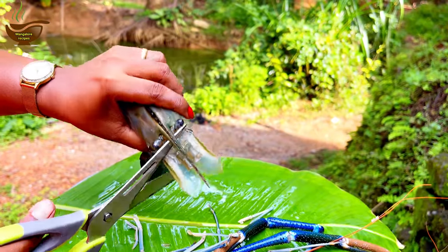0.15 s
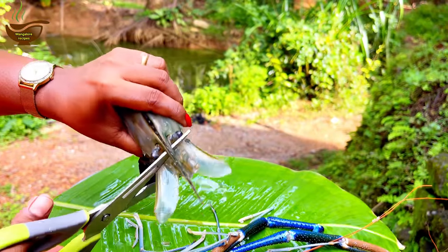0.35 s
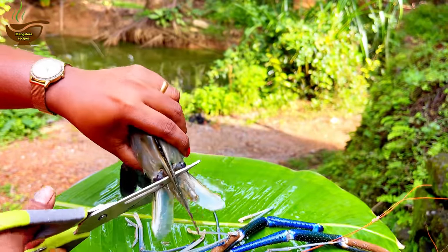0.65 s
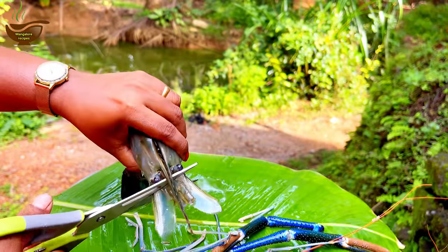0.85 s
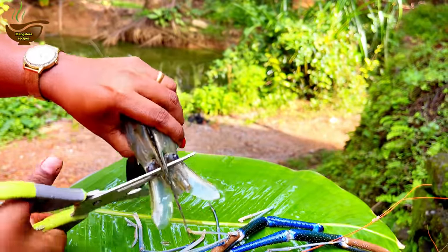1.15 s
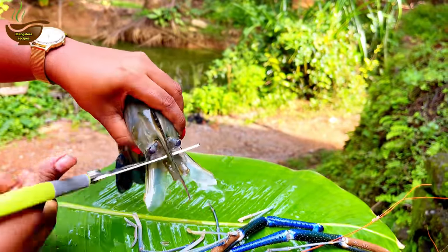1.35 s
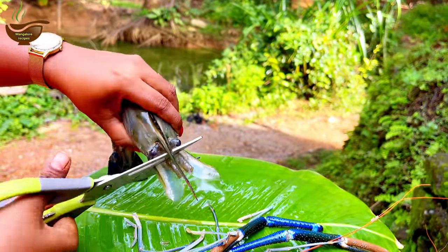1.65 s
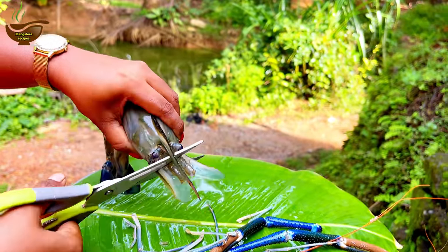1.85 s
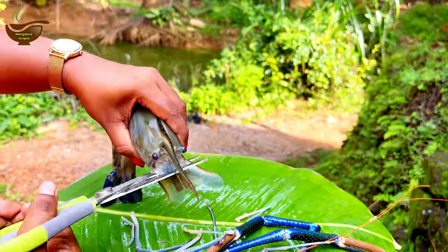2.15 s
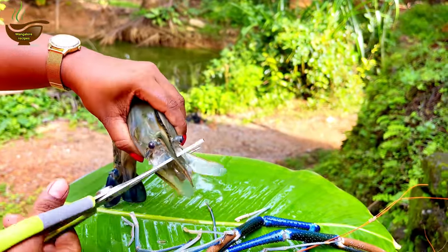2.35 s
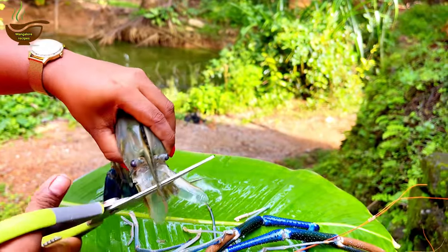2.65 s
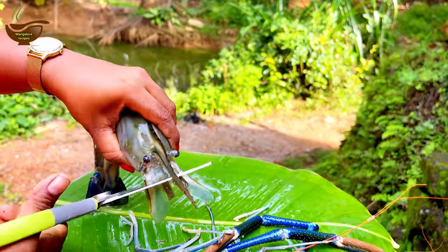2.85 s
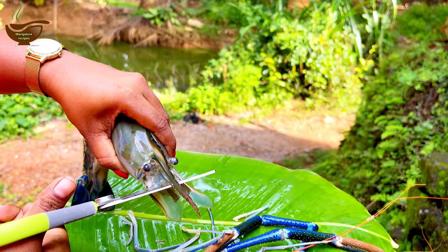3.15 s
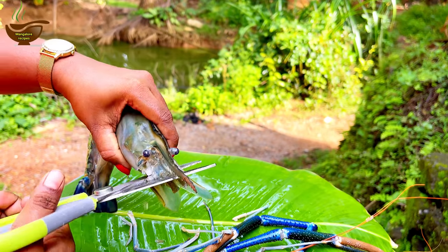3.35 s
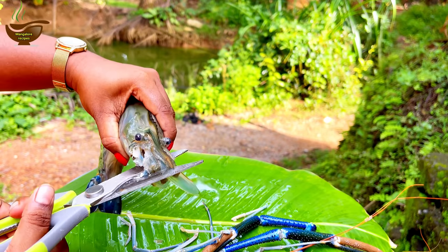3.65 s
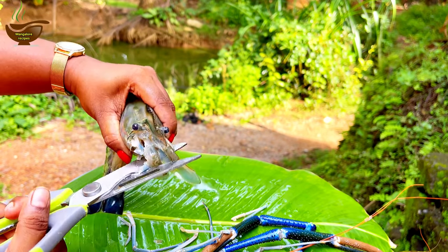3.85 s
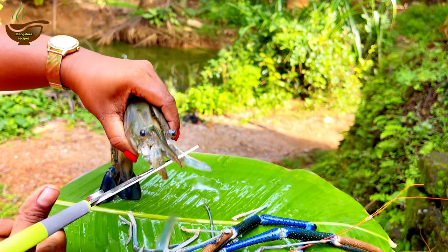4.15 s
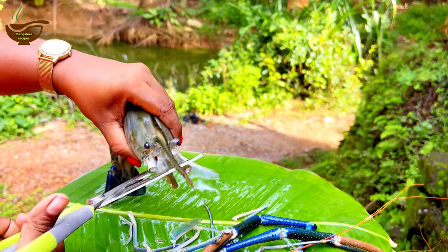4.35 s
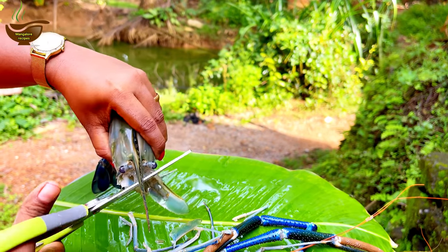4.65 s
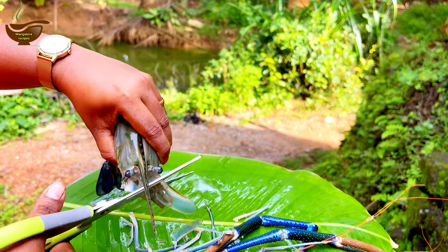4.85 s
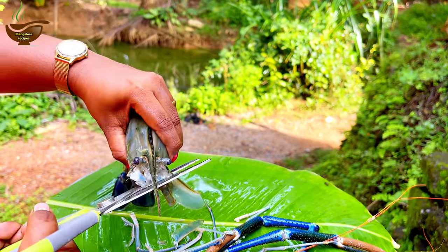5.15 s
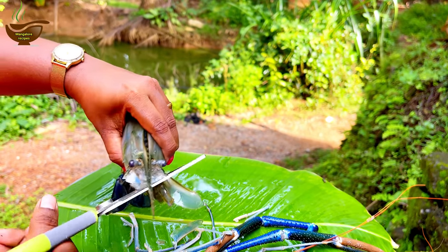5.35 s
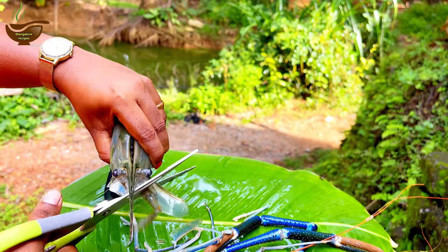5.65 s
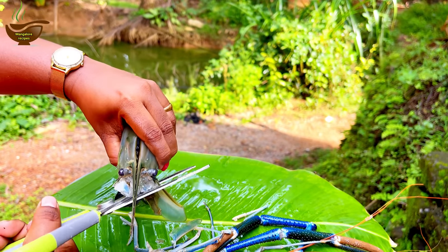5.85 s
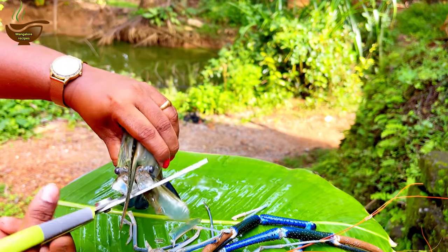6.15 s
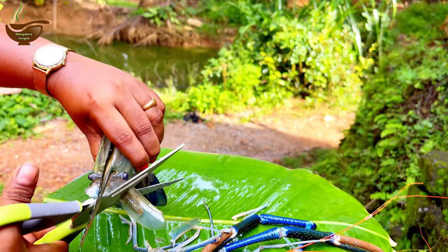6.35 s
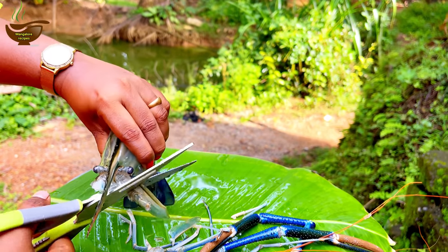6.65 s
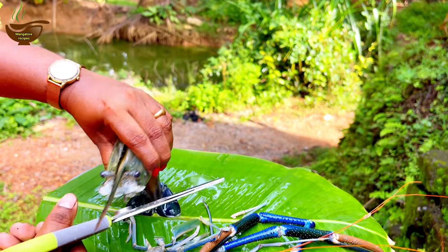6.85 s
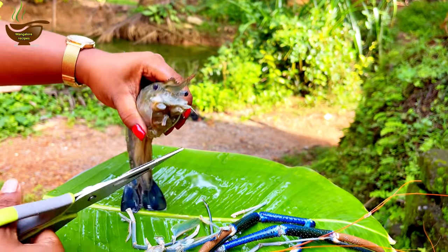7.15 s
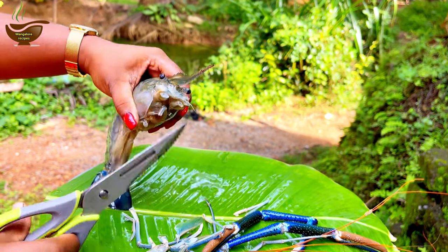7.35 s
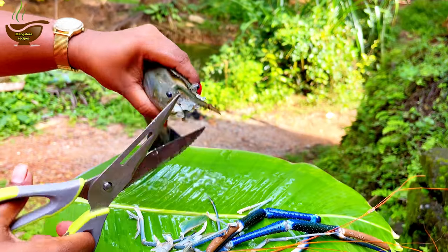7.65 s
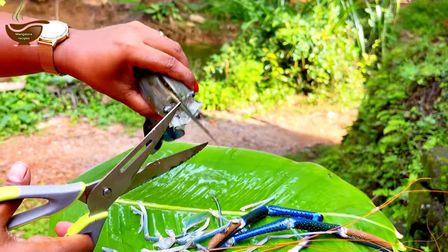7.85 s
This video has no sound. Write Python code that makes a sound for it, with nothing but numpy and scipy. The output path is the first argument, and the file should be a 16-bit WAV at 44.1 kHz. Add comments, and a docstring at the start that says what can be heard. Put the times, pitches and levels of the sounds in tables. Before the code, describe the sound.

Outdoors, over a low far-off traffic rumble, a faint hum and thin high insect song, scissors snip through hard prawn shell close by. Bursts of brittle cracking alternate with quieter scrapes and short rings of the steel blades. The cuts come thicker in the second half, and pieces land with soft thuds on a table covered by a leaf. After one strong final crunch, light knocks and clinks follow.

```python
"""Outdoors, at a table covered with a banana leaf, kitchen scissors cut up a prawn close by.
The shell breaks in sharp cracks, the steel blades knock and ring, and cut pieces thud on the table.
In between, blades and prawn legs scrape over shell and leaf.
Cicadas and a katydid (a bush cricket) sing, faint whistles glide, and far traffic rumbles
under a motor-like hum. Near the end a faint drone rises."""
import sys
import numpy as np
from scipy import signal
from scipy.fft import rfft, irfft, next_fast_len
from scipy.io import wavfile
from scipy.ndimage import uniform_filter1d, map_coordinates

SR = 44100
rng = np.random.default_rng(int(sys.argv[2]) if len(sys.argv) > 2 else 0)


def transcribe(signal):
    """Save signal, clipped to [-1, 1], as a 16-bit WAV file at the path in sys.argv[1]."""
    frames = np.atleast_2d(signal).T
    limited = np.clip(frames, -1, 1)
    pcm = np.round(limited * 32767).astype(np.int16)
    wavfile.write(sys.argv[1], SR, pcm)


N = 352359

# Rubbing strokes: t/s, length/s, rasp level/dB, fizz level/dB
STROKES = [(0, 0.074, -61.5, -62.5), (0.155, 0.026, -60, -62), (.672, 0.15, -83, -66),
           (1.494, 0.047, -60.5, -60), (1.614, .019, -61.5, -57), (1.694, 0.094, -67.5, -66),
           (1.806, 0.11, -65.5, -59), (1.936, 0.19, -80, -62), (2.119, 0.11, -56.5, -61.5),
           (2.265, 0.097, -59.5, -74), (2.375, .028, -47.5, -49), (2.491, 0.064, -54.5, -65),
           (2.645, 0.12, -57, -59), (2.896, 0.078, -68, -81), (3.087, 0.04, -61, -67),
           (3.193, 0.028, -60, -63), (3.26, .1, -74.5, -74), (3.454, 0.06, -67, -62),
           (3.673, .055, -57.5, -58.5), (3.895, .11, -62, -67), (4.11, 0.025, -53, -67),
           (4.255, 0.069, -74, -80), (4.354, 0.032, -54, -50), (4.396, 0.058, -52, -52.5),
           (4.517, 0.063, -57, -57.5), (4.626, 0.08, -57, -53.5), (4.735, 0.029, -61, -75),
           (4.797, .06, -69, -63), (4.879, 0.061, -68, -55), (4.972, 0.023, -68, -57),
           (5.041, 0.04, -53, -51), (5.103, 0.07, -72, -56), (5.372, 0.083, -66, -46.5),
           (5.571, 0.082, -85, -58), (5.669, 0.026, -74, -61), (5.742, 0.032, -43, -55),
           (5.782, .034, -64, -58), (5.941, 0.057, -78, -73), (6.082, 0.096, -63, -76),
           (6.165, 0.038, -64, -61), (6.375, .14, -69, -78), (6.519, 0.12, -70, -63),
           (6.706, 0.13, -55, -54.5), (7.338, 0.042, -50.5, -64), (7.385, 0.063, -61, -62.5),
           (7.506, 0.035, -56, -51.5), (7.602, .02, -58, -62), (7.638, 0.19, -66, -73),
           (7.943, .05, -67, -66)]
# The notes the steel blades ring at: f/Hz, level/dB, t60/s (the time to fade by 60 dB)
STEEL_NOTES = [(1800, -11.5, .14), (2460, -8, .07), (2526, -11, .14), (2900, -2, .1), (3180, -6, .042),
               (3870, -6, .09), (3990, -2.5, .14), (4310, -9, .06), (4800, -10, .05), (5300, -12, .07)]


def amp(db):
    """Turn decibels into a gain to multiply by."""
    return 10 ** (np.asarray(db) / 20)


def unit(x):
    """Scale a sound to an average (rms) strength of 1."""
    return x / np.sqrt(np.mean(x ** 2) + 1e-20)


def along(points, hz):
    """Read between (f/Hz, value) points, on a scale of octaves."""
    f, values = np.transpose(points)
    return np.interp(np.log(hz + 1), np.log(f + 1), values)


def curves(rows):
    """Turn rows of (t/s, values...) into one curve per value, sample by sample."""
    times, *columns = np.transpose(rows)
    return [np.interp(np.arange(N) / SR, times, column) for column in columns]


def wobble(rate):
    """A smooth random curve through `rate` random points a second."""
    return map_coordinates(rng.standard_normal(int(N * rate / SR) + 4), [np.arange(N) * rate / SR])


def filtered(x, response):
    """Multiply each frequency in x by response(hz)."""
    size = next_fast_len(N + 8192)
    return irfft(rfft(x, size) * response(np.fft.rfftfreq(size, 1 / SR)), size)[..., :N]


def noise(spectrum, shape=N):
    """Noise of strength 1, coloured by (f/Hz, level/dB) points."""
    return unit(filtered(rng.standard_normal(shape), lambda hz: amp(along(spectrum, hz))))


def narrow(hz, width_hz):
    """A narrow band of noise around a pitch, which may move."""
    slow = filtered(rng.standard_normal((2, N)), lambda f: np.exp(-(f / width_hz) ** 2))
    phase = 2 * np.pi * np.cumsum(hz * np.ones(N)) / SR
    return unit(slow[0] * np.cos(phase) + slow[1] * np.sin(phase))


def puffs(db, t60, rise_s, size):
    """Loudness shapes that jump up and die away, one a row."""
    t = np.arange(size) / SR
    return amp(db[:, None] - 60 * t / np.clip(t60, .002, .5)[:, None]) * (1 - np.exp(-t / rise_s))


def place(start, rows):
    """Add short sounds, one a row, at their start times in seconds."""
    at = np.maximum(np.round(start * SR).astype(int)[:, None] + np.arange(rows.shape[1]), 0)
    return np.bincount(at.ravel(), rows.ravel(), N + SR)[:N]


def ringing(hits, notes, rise_s, blur_hz, scatter_db=2.5):
    """A struck object rings: the spot hit favours notes near one pitch, and loose contact blurs them."""
    out, t = np.zeros(N + SR), np.arange(SR // 3) / SR
    for start, db, damping, favoured_hz, octave_loss_db in hits:
        drift = np.cumsum(rng.standard_normal((len(notes), len(t))), axis=1)
        drift *= np.sqrt(2 * np.pi * blur_hz / SR)
        ring = 0
        for (hz, note_db, t60), phase in zip(notes, drift):
            level = note_db + rng.normal(0, scatter_db) - octave_loss_db * np.log2(hz / favoured_hz) ** 2
            ring += amp(level - 60 * damping * t / t60) * np.sin(2 * np.pi * hz * t + phase)
        out[round(start * SR):][:len(t)] += amp(db) * ring * (1 - np.exp(-t / rise_s))
    return out[:N]


def traffic_and_leaves():
    """Far traffic and leaves make a gently swelling rumble and hiss, partly different left and right."""
    # Colour of the background: f/Hz, level/dB
    spectrum = [(15, -51.5), (25, -18.5), (58, 2), (174, -9.5), (250, -15.5), (400, -17.5), (640, -22.5),
                (760, -29.5), (1350, -32.5), (1600, -34), (2300, -38), (5000, -42), (8200, -42),
                (10800, -34.5), (11600, -70), (16000, -110)]
    # How alike left and right are: f/Hz, likeness (1 = the same)
    likeness = [(60, .93), (130, .92), (290, .7), (640, .35), (3000, .45), (8000, .7)]

    def shares(hz):
        angle = np.arccos(np.clip(along(likeness, hz), -1, 1)) / 2
        return np.array([np.cos(angle), np.sin(angle)])

    middle, side = filtered(noise(spectrum, (2, N)), shares)
    swell = amp(.6 * wobble(4) + .8 * wobble(1.3))
    return amp(-49.5) * swell * np.array([middle + side, middle - side])


def hum():
    """A far motor-like hum: two wavering tones that drift in pitch together."""
    # Course of the upper tone: t/s, f/Hz, level/dB
    course = [(0, 604, -66.5), (1.5, 607.8, -69), (3, 578, -67.5), (6, 564.3, -78.5), (7.99, 563, -62.5)]
    hz, db = curves(course)
    return amp(db) * (narrow(hz, width_hz=18.4) + amp(-6) * narrow(hz * .84, width_hz=8.9))


def cicadas():
    """Cicadas sing without a break in two high, fluttering bands."""
    # Bands of song: f/Hz, width/Hz, level/dB
    bands = [(7020, 350, -74), (9140, 480, -68)]
    return sum(amp(db + 2.6 * wobble(60) + .28 * wobble(4.4)) * narrow(hz, width)
               for hz, width, db in bands)


def katydid():
    """A katydid rubs its wings; each stroke swells, fades and slides down in pitch."""
    # Loudness of the song: t/s, level/dB
    loudness = [(0, -66), (1, -63), (3.5, -55), (5, -52), (6, -54), (6.6, -53), (7.1, -59), (7.3, -74),
                (7.99, -64)]
    stroke_s = .08975
    since = (np.arange(N) / SR - .064) % stroke_s
    swell = (since / .026) ** 1.36 * np.exp(1.5 - 1.67 * since / .021)
    hz = 10450 - 1300 * since / .06
    wing = narrow(hz, width_hz=320) + amp(-6) * narrow(hz + 250, width_hz=720)
    return amp(curves(loudness)[0] + .7 * wobble(7.6)) * swell * wing


def scraping():
    """Blades and legs rub shell and leaf in quick, gritty slips; each stroke starts fast and eases off."""
    # Colour of the low rasp: f/Hz, level/dB
    rasp_spectrum = [(500, 7), (1300, 7), (1900, 2), (2600, 1), (3400, -3.5), (4200, 0), (6000, -4.5),
                     (9000, -53)]
    # Colour of the high fizz: f/Hz, level/dB
    fizz_spectrum = [(3000, -25), (5500, -9), (8000, 2), (10500, -1.5), (11500, -6), (12300, -35),
                     (16000, -42)]

    def steel(f, width_hz=110):
        """Rubbing keeps the hand-damped steel humming at its own notes."""
        return 1 + sum(amp(db + 7) * 1j * f * width_hz / (hz * hz - f * f + 1j * f * width_hz)
                       for hz, db, _ in STEEL_NOTES)

    start, length, rasp_db, fizz_db = np.transpose(STROKES)
    t = np.arange(SR // 4) / SR
    past_end = np.clip(t - length[:, None], 0, None)
    stroke = np.clip(t / .011, 0, 1) * amp(-4 * t / length[:, None] - 60 * past_end / .059)
    slips = wobble(220)
    rubbing = amp(2.5 * slips + 1.5 * wobble(40)) * noise(rasp_spectrum)
    rasp = unit(filtered(rubbing, steel))
    fizz = unit(amp(3 * slips + 1.5 * wobble(60)) * noise(fizz_spectrum))
    return (place(start, amp(rasp_db)[:, None] * stroke) * rasp
            + place(start, amp(fizz_db)[:, None] * stroke) * fizz)


def small_breaks(per_second=47, spread_db=4, t60_ms=6.2):
    """Random tiny breaks along each stroke, as loud and dull as its rubbing: columns for shell_cracks."""
    start, length, rasp_db, fizz_db = np.transpose(STROKES)[..., None]
    draws = -np.log(rng.random((len(STROKES), 2, 12)))  # mostly small, now and then large
    wait, strength = draws[:, 0], draws[:, 1]
    since = np.cumsum(wait / per_second, axis=1)
    db = fizz_db + 10 + spread_db * strength - 200 * (since > length)  # silent once the stroke ends
    columns = np.broadcast_arrays(start + np.minimum(since, length), db, rasp_db - fizz_db, t60_ms)
    return [column.ravel() for column in columns]


def shell_cracks():
    """The shell creaks, then breaks with a bright burst over a dull one; loose splinters trail after."""
    # The louder breaks: t/s, level/dB, dull part above that level/dB, t60/ms
    breaks = [(0.4956, -37.5, 13.5, 9.1), (0.5393, -36.5, 13.5, 3.7), (0.6821, -25, -10, 21),
              (0.6907, -30.5, 5, 10), (.695, -23, -10, 5.7), (0.718, -22.5, -1.5, 19),
              (0.7229, -11.5, -3, 5.2), (0.7503, -18.5, -6, 5.9), (0.9362, -42, 1.5, 5.7),
              (1.0564, -41.5, 3, 4.9), (1.1405, -57, 16, 6), (1.156, -54.5, 14, 7),
              (1.2561, -43.5, -4.5, 15), (1.5153, -40, -5, 6), (1.5347, -40, 3, 6), (1.6949, -41, -17, 4),
              (1.7084, -27.5, -10, 5.9), (1.7207, -49, -11, 4.5), (1.7375, -25.5, -9.5, 8.4),
              (1.763, -44, -13, 4), (1.7789, -42, -14, 9.8), (1.79, -28.5, -15, 6.4),
              (1.8076, -26, -32, 3.8), (1.8312, -33, -15, 8), (1.8348, -23.5, -21, 6.3),
              (1.849, -19, -42, 4.9), (1.878, -39, -12, 4), (1.8884, -22.5, -41, 7.3), (1.901, -33, -18, 4),
              (1.911, -42, -1, 10), (1.918, -37, -33, 20), (1.958, -27, -14, 5.2), (1.9783, -35, -18, 7),
              (1.9848, -28, -22, 4.3), (1.9959, -5.5, -5, 4.4), (2.0327, -23.5, -7, 12.5),
              (2.0458, -8, -5, 8.5), (2.067, -27, -14, 12), (2.168, -17, 0, 5.2), (2.1846, -26, -6, 5.5),
              (2.383, -40.5, 18, 8), (2.3893, -24.5, 12, 7.1), (2.3948, -31, -6, 12), (2.4235, -34, 1, 10),
              (2.5202, -31, 4, 7.9), (3.1313, -35, 24.5, 2.7), (3.2198, -32, -0.5, 8.3),
              (3.238, -27, -35, 4.1), (3.2701, -35.5, 1.5, 5.2), (3.2844, -30.5, -21, 3.7),
              (3.3014, -30.5, -11, 11), (3.473, -30, -6, 7.8), (3.5033, -23.5, -4, 16),
              (3.5097, -23, -3.5, 11), (3.5274, -19, -19, 9.7), (3.5452, -21.5, -19, 3.2),
              (3.686, -36.5, -10, 24), (4.1198, -49, 6, 15), (4.181, -48.5, 14.5, 6.3),
              (4.2792, -36, -4, 7.3), (4.3537, -39.5, 18.5, 4.7), (4.3671, -33, 1, 5),
              (4.4092, -39, 19, 3.8), (4.424, -33, -8, 4.5), (4.635, -37.5, 3.5, 6), (4.639, -34, 2, 6.9),
              (4.673, -45.5, 4, 25), (4.6872, -52, 6, 21), (4.759, -48, 11.5, 9.9),
              (4.8103, -38.5, -3, 9.4), (4.8448, -32, -25, 11), (4.8805, -29, -26, 4),
              (4.8923, -28, -26, 5.4), (4.899, -21.5, -34, 5.5), (4.9047, -23, -29, 4),
              (4.915, -19.5, -13, 6.4), (4.9352, -24.5, -27, 3.7), (4.9977, -33, -13, 8),
              (5.0023, -28, -26, 27), (5.0065, -25.5, -4.5, 6.6), (5.036, -18, -11, 3.6),
              (5.046, -17, -8, 5.7), (5.0541, -17, -10, 7.6), (5.067, -23, -21, 5.3), (5.073, -17, -23, 4),
              (5.0769, -18, -19, 4.3), (5.0803, -15.5, -35, 3.5), (5.1168, -30, -20, 4),
              (5.122, -21, -13, 11), (5.1287, -18, -28, 2.9), (5.3848, -31, -5.5, 11),
              (5.3992, -31, -19, 6.3), (5.4257, -23, -11, 6.3), (5.431, -33, 0, 7.8), (5.469, -33, -7, 6.6),
              (5.4758, -27, -12, 12), (5.5624, -55, 8, 10), (5.58, -26, -21, 5.9), (5.608, -37, -22, 6.7),
              (5.627, -38, -20, 4.8), (5.6476, -13, -11, 6.6), (5.667, -23, -17, 4.4),
              (5.673, -16.5, -13, 7.1), (5.7196, -38.5, 7, 16), (5.7394, -35, 7, 30),
              (5.8, -14.5, -13, 3.7), (5.8057, -16.5, -13, 4.7), (5.8113, -22, -10, 5.5),
              (5.866, -39.5, -11, 5.4), (5.9511, -47, 11, 7.4), (6.0506, -53, 16, 5.5),
              (6.0828, -40, -19, 6.8), (6.108, -50.5, 9, 19), (6.2201, -38, 5, 29), (6.272, -38.5, 2, 27),
              (6.4924, -41, -1, 6.5), (6.5393, -19, -19, 4.2), (6.5566, -22, -11, 9.1),
              (6.5643, -21, -12, 6.3), (6.581, -14.5, -23, 2.9), (6.584, -12.5, -27, 6.6),
              (6.5924, -10, -56, 7.6), (6.5981, -17.5, -15, 8.6), (6.61, -13.5, -19, 3.7),
              (6.6501, -12, -42, 6.9), (6.694, -22, -12, 14), (6.699, -3.5, -16, 6.5),
              (6.7067, -9, -11.5, 20), (6.7096, -7, -5.5, 10), (6.7126, -7.5, -8, 11.6),
              (6.777, -35.5, 11, 6), (7.3234, -34, 0, 11), (7.3424, -43, 6, 29), (7.516, -43, 3, 23),
              (7.5224, -33.5, -20, 6), (7.649, -34.5, -3, 10)]
    # Colour of thin splinters: f/Hz, level/dB
    thin_shell = [(1800, -6.5), (3000, -22), (4500, -2), (7000, -6.5), (9000, 0.5), (11000, 6.5),
                  (12500, -6), (13800, -19), (15300, -9.5), (16500, -55)]
    # Colour of thick shell: f/Hz, level/dB
    thick_shell = [(300, -19), (600, -3), (1400, -5.5), (2600, -3), (4200, -0.5), (5500, -2.5), (9000, -76)]
    start, db, dull_db, t60_ms = np.hstack([np.transpose(breaks), small_breaks()])
    size, t60 = 2048, t60_ms / 1000
    hz = np.fft.rfftfreq(size, 1 / SR)
    # A thinner splinter rings higher, a duller break lower: one broad peak in its colour.
    splinter_hz = 7360 * 2 ** (-dull_db / 108)
    colour_db = 14 * np.exp(-(np.log((hz + 1) / splinter_hz[:, None]) / .61) ** 2)
    # Each also has a few sharper notes of its own.
    colour_db += 10.6 * uniform_filter1d(rng.standard_normal(colour_db.shape), size=9, axis=1)
    # Faint or dull cracks are played softer above 11 kHz, so they sound less crisp.
    treble_db = 1.2 * np.minimum(db - .4 * dull_db + 23, 0)
    colour_db += treble_db[:, None] * np.clip((hz - 11000) / 1500, 0, 1)
    grit = irfft(rfft(rng.standard_normal((len(start), size))) * amp(along(thin_shell, hz) + colour_db))
    grit /= grit.std(axis=1, keepdims=True)
    bright = puffs(db, t60, rise_s=.00041, size=size)
    trail = puffs(db - 20.5, t60 * 3.4, rise_s=.0009, size=size)
    dull = puffs(db + dull_db, t60, rise_s=.0018, size=size)
    # The creak is a puff turned backwards, so it grows into the break.
    creak = puffs(db - 21, np.full_like(start, .008), rise_s=1e-5, size=size)[:, ::-1]
    return (place(start - size / SR, creak * grit) + place(start, (bright + trail) * grit)
            + place(start, dull) * noise(thick_shell))


def blade_knocks():
    """The blades knock together and ring, mostly at the notes that the struck spot favours."""
    # Knocks: t/s, level/dB, damping (higher fades faster), favoured f/Hz
    knocks = [(0.4955, -31, 4.6, 1840), (1.14, -31, 11, 1770), (1.154, -39, 11, 1770),
              (2.13, -44.5, 2.8, 3600), (2.208, -50, 1.6, 3600), (2.425, -41, 2.6, 4000),
              (2.446, -39, 2.7, 3600), (3.13, -40, 5.8, 2340), (4.397, -45.5, 0.81, 2620),
              (5.744, -35, 2, 3080), (6.224, -36.5, 1.5, 4000), (6.251, -43, 1.6, 3200),
              (6.274, -45, 1.8, 4500), (6.7126, -9, 8, 2630), (7.343, -46, 1.2, 2380),
              (7.509, -54, 2.5, 2700), (7.53, -42, 1.2, 2740), (7.551, -51, 0.51, 2320),
              (7.601, -62, .87, 4100), (7.647, -48.5, 1.3, 2940), (7.682, -60, 0.42, 3950)]
    octave_loss_db = 45
    return ringing([(*knock, octave_loss_db) for knock in knocks], STEEL_NOTES, rise_s=.00077, blur_hz=12)


def thuds():
    """A soft piece lands and rings the table, while the leaf on top slaps and rustles."""
    # Landings: t/s, level/dB, slap above that level/dB, damping, favoured f/Hz, loss an octave away/dB
    landings = [(.544, -49, -19, 1.4, 500, 11), (2.423, -36.5, -6.5, 1, 455, 2.5),
                (4.011, -42.5, -19, 4, 1050, 3), (4.408, -37.5, -16, 2.3, 1050, 7),
                (5.432, -27, -15.5, 1.43, 515, 3), (5.739, -43, -3.5, .86, 1100, 7),
                (6.221, -27.5, -10.5, 0.99, 640, 4), (7.321, -26.5, -13.5, 1.58, 445, 5.5),
                (7.522, -34.5, -23, 0.65, 520, 14), (7.538, -32, -47, .8, 656, 42),
                (7.656, -42, -16, 0.91, 650, 31)]
    # The notes the table rings at: f/Hz, level/dB, t60/s
    table_notes = [(291, 4.5, 0.15), (436.7, -3, 0.088), (546, -4.5, 0.046), (711, -9, 0.1),
                   (770, -13, 0.21), (924, -28, 0.29), (1102, -12.5, 0.071), (1119, 0, 0.13),
                   (1747, -9.5, 0.14), (2326, -28, 0.3), (2930, -22.5, 0.12), (4370, -14, 0.15),
                   (4570, -19.5, 0.072)]
    # Colour of the leaf's slap: f/Hz, level/dB
    leaf_spectrum = [(300, -35), (900, 9.5), (1500, 3), (2500, 2.5), (4400, 3), (7000, -7), (11500, -2),
                     (13000, -66)]
    start, db, slap_db, damping, favoured_hz, octave_loss_db = np.transpose(landings)
    slaps = place(start, puffs(db + slap_db, .2 / damping, rise_s=.004, size=9000))
    rustle = amp(3 * wobble(200))
    hits = zip(start, db, damping, favoured_hz, octave_loss_db)
    table = ringing(hits, table_notes, rise_s=.0011, blur_hz=19)
    return table + slaps * rustle * noise(leaf_spectrum)


def whistles(fade_s=.0096):
    """Thin, far-off tones glide from one pitch to another, wavering slightly."""
    # Glides: t/s, length/s, first f/Hz, last f/Hz, level/dB
    glides = [(.93, .18, 5200, 6250, -77), (1.1, .13, 6250, 6040, -77), (1.22, .12, 6040, 6150, -78),
              (1.36, .16, 5600, 6060, -77), (1.64, .08, 5420, 5480, -79), (4.468, .06, 5300, 5650, -75),
              (4.583, .05, 5700, 5220, -78), (7.66, .22, 5300, 5400, -77), (7.89, .12, 4950, 5020, -81)]
    out, t = np.zeros(N), np.arange(N) / SR
    waver_hz = 30 * wobble(90)
    for start, length, first_hz, last_hz, db in glides:
        progress = np.clip((t - start) / length, 0, 1)
        hz = first_hz + (last_hz - first_hz) * np.sin(np.pi / 2 * progress)
        fade = np.clip(np.minimum(t - start, start + length - t) / fade_s, 0, 1)
        out += fade * amp(db) * np.sin(2 * np.pi * np.cumsum(hz + waver_hz) / SR)
    return out


def drone():
    """A faint, breathy drone rises far off near the end."""
    # Loudness of the drone: t/s, level/dB
    loudness = [(0, -106), (6.7, -88), (7, -74.5), (7.99, -68.5)]
    return amp(curves(loudness)[0]) * narrow(1320, width_hz=250)


def echoes(x, t60_scale, gap_s):
    """Scattered echoes, left and right; high sounds die away sooner than low ones."""
    # Echo fade times, before t60_scale shortens them: f/Hz, t60/s
    fade_times = [(300, 0.4), (2000, 0.21), (6000, 0.18), (12000, 0.08)]
    hz, t, spectra = signal.stft(rng.standard_normal((2, SR // 2)), SR, nperseg=64)
    fade = amp(-60 * t / t60_scale / along(fade_times, hz)[:, None])
    tail = signal.istft(spectra * fade, SR, nperseg=64)[1]
    delayed = np.pad(x, (round(gap_s * SR), 0))
    return signal.fftconvolve(delayed[None], tail / np.linalg.norm(tail[0]), axes=1)[:, :N]


def scene():
    """Close cutting with quick echoes off leaf and hands and slower ones off a bank; far sounds behind."""
    cutting = shell_cracks() + thuds() + blade_knocks() + scraping()
    far = cicadas() + katydid() + drone() + whistles()
    quick_echoes = amp(-20.5) * echoes(cutting, t60_scale=.12, gap_s=.0002)
    slow_echoes = echoes(amp(-17.5) * cutting + amp(-38) * far, t60_scale=.7, gap_s=.004)
    return cutting + far + quick_echoes + slow_echoes + traffic_and_leaves() + hum()


def record(dry):
    """Two microphone openings: the left hears more middle and lags in the treble; both cut the very top."""
    # How much louder the left is than the right: f/Hz, level/dB
    left_over_right = [(60, 0), (200, 2.5), (400, 0), (700, 9), (1300, 5), (2400, 7), (5500, 4),
                       (7600, 6.5), (8600, 0), (15000, 0)]
    top_hz = 16700
    half = np.array([[.5], [-.5]])  # left and right each take half, in opposite directions

    def response(hz):
        lag_radians = -.7 * hz / (hz + 900) + 1.9 * np.clip(hz - 8380, 0, None) / 1000
        gain = amp(half * along(left_over_right, hz)) / (1 + (hz / top_hz) ** 400)
        return gain * np.exp(-1j * half * lag_radians)

    return filtered(dry, response)


dry = scene()
out = record(dry)
transcribe(out)
```